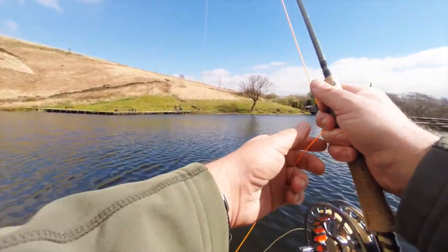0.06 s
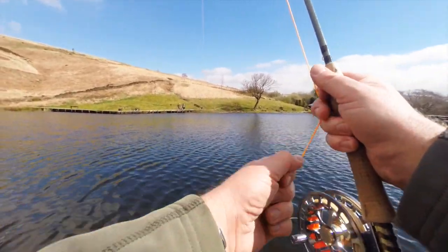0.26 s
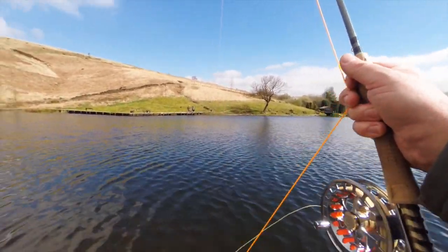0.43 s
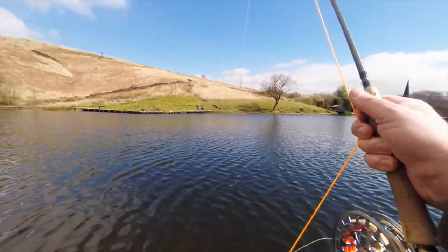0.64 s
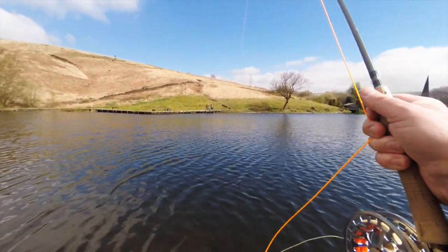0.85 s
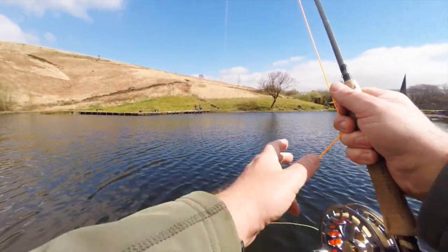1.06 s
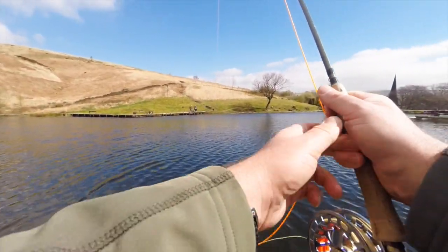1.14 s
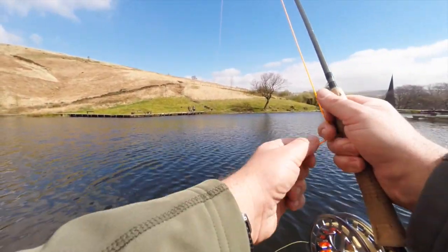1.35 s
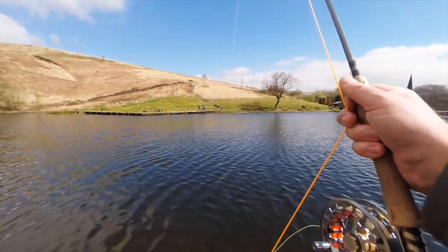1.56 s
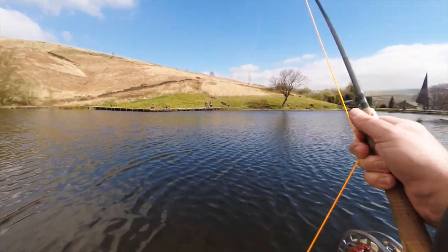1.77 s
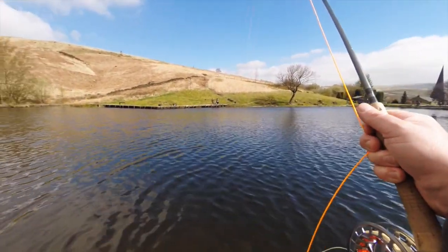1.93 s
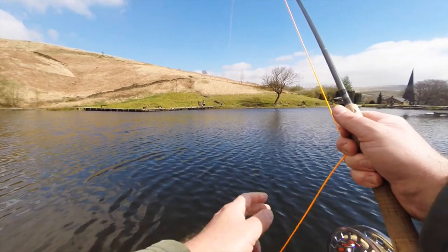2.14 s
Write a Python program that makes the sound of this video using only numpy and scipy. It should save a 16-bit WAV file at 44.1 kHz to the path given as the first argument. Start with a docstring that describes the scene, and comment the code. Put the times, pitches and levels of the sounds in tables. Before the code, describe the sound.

Fishing line drawn through rod guides twice, with sleeve swishes and wind on the microphone.

```python
"""Stripping fly line on a lake.

An angler draws in line in two pulls, close to a chest camera. Friction makes the line sing in the rod
guides and squeak as it catches, while the jacket sleeve swishes with each reach and draw of the arm.
Wind buffets the microphone; behind it are the lake's hush, one faint trill and a thin electrical whine."""
import sys
import numpy as np
from scipy.fft import rfft, irfft, next_fast_len
from scipy.io import wavfile
from scipy.ndimage import uniform_filter1d, map_coordinates

SR = 44100
rng = np.random.default_rng(int(sys.argv[2]) if len(sys.argv) > 2 else 0)


def file_out(sig):
    """Save sig as 16-bit WAV at sys.argv[1]."""
    # one column per channel
    cols = np.atleast_2d(sig).T
    # limit, then scale
    lim = np.clip(cols, -1, 1)
    pcm = np.round(lim * 32767).astype(np.int16)
    wavfile.write(sys.argv[1], SR, pcm)


N = 97020

# Envelopes of the singing line, one list per pull: time_s, level_db
LINE_PULLS = [
    [(0.392, -63), (.42, -51), (.47, -47.5), (.55, -44), (.61, -52), (.67, -49.5), (.72, -54), (.745, -71)],
    [(1.56, -64), (1.61, -55), (1.66, -46.5), (1.75, -48), (1.80, -52.5), (1.87, -50.5), (1.92, -68)],
]
# Resonances of line and guides: centre_hz, half_width_hz, gain_db
GUIDE_MODES = [(2800, 110, -1), (3024, 80, 2), (3235, 37, 7.5), (3330, 160, 1.5), (3500, 150, -3.5)]

def line():
    """Forced resonance: sliding friction excites close modes of line and guides, and a hollow rod tone."""
    def modes(f):
        peaks = (amp(db) / (1 + ((f - hz) / width) ** 2) for hz, width, db in GUIDE_MODES)
        return np.sqrt(sum(peak ** 2 for peak in peaks))

    def grip(pull):
        inside_s = np.minimum(clock() - pull[0][0], pull[-1][0] - clock())
        return np.clip(inside_s / 0.0092, 0, 1)  # grip and release take 9.2 ms each

    rod_hz, half_width_hz, rod_db = 960, 170, -4
    singing = unit(filtered(white(), modes)) * amp(0.64 * wobble(70))
    rub = amp(rod_db) * unit(filtered(white(), lambda f: 1 / (1 + ((f - rod_hz) / half_width_hz) ** 4)))
    return (singing + rub) * sum(amp(curves(pull)[0]) * grip(pull) for pull in LINE_PULLS)


# Catches of the line: centre_s, pitch_hz, sigma_s, peak_db
LINE_CATCHES = [(0.6736, 8400, 0.0002, -33.5), (0.6791, 3640, 0.0007, -31.5), (0.6803, 3730, 0.0035, -45),
                (.679, 4200, 0.0017, -51), (0.69, 4700, .004, -56), (1.2452, 4240, 0.0022, -42),
                (1.246, 3650, .002, -42), (1.8533, 3660, 0.0017, -35.5)]

def squeaks():
    """Stick-slip oscillation: each catch of the line gives a tiny tone under a Gaussian envelope."""
    out = np.zeros(N)
    for centre_s, hz, sigma_s, db in LINE_CATCHES:
        t = clock() - centre_s
        envelope = amp(db) * np.exp(-.5 * (t / sigma_s) ** 2)
        out += envelope * np.sin(2 * np.pi * hz * t + 0.75 * wobble(700))
    return out


# Arm movements: start_s, fastest_s, end_s, body_db, hiss_db, hiss_tilt_db_per_octave
ARM_STROKES = [(-.2, .02, 0.27, -44.5, -50.5, 2.5), (.35, 0.587, 0.85, -41.5, -48, -2.5),
               (0.58, 0.777, 0.85, -43.5, -58, 2.5), (0.988, 1.223, 1.268, -39, -46, 3),
               (1.186, 1.355, 1.433, -54, -56, 3), (1.582, 1.75, 1.871, -38.5, -47, -1.5),
               (1.742, 1.88, 2.024, -43.5, -52, -2), (2.02, 2.207, 2.2, -52, -58.5, 2.5)]
# Spectra of the sleeve's hollow body and of its hiss: frequency_hz, gain_db
BODY_SPECTRUM = [(60, 5), (200, -12.5), (480, -3), (640, -3), (830, 0.5), (1020, -3), (1300, -14),
                 (1650, -17), (2300, -19.5), (3500, -28), (8000, -76)]
HISS_SPECTRUM = [(1000, -30), (2600, -9.5), (3500, -2), (4600, -0.5), (5900, -5.5), (6700, -3), (7500, -9),
                 (8400, -5.5), (9300, -17), (10300, -12), (12500, -19.5), (15000, -26)]

def sleeve():
    """Friction noise: rubbing cloth grows louder as a power of arm speed; tiny slips add grain."""
    slips_per_s, slip_share = 610, 0.21
    out = np.zeros(N)
    for start, fastest, end, body_db, hiss_db, tilt_db in ARM_STROKES:
        slips = unit(white() * (rng.random(N) < slips_per_s / SR))
        friction = np.sqrt(1 - slip_share) * white() + np.sqrt(slip_share) * slips
        arm = speed(start, fastest, end)
        hiss = amp(hiss_db) * arm ** 1.25 * coloured(friction, HISS_SPECTRUM, tilt_db)
        body = amp(body_db) * arm ** 0.89 * coloured(white(), BODY_SPECTRUM)
        out += amp(0.96 * wobble(59.66)) * (body + hiss)
    return out


# Contacts of line and fingers with the rod: time_s, peak_db, centre_hz, sigma_octaves
ROD_TAPS = [(0.3528, -36, 1870, 0.57), (0.351, -39.5, 5300, 0.32), (.378, -45, 4860, 0.46),
            (0.956, -45, 1900, 0.72), (1.034, -40.5, 1500, 0.73), (1.044, -38.5, 7000, 0.69),
            (1.057, -45, 3000, .8), (1.073, -39, 4200, 0.61), (1.283, -40, 2180, .8),
            (1.9708, -30, 1190, .9), (2.006, -42.5, 3300, .6), (2.0195, -43, 1600, 0.91),
            (2.0801, -40.5, 4160, 0.57), (2.105, -41, 3300, 0.58)]

def taps():
    """Damped impact: an impulse and a short scuff pass through a broad band, with hardly any ring."""
    scuff_gain, scuff_t60_s = 0.2, 0.012
    out = np.zeros(N)
    for time_s, db, hz, octaves in ROD_TAPS:
        age = clock() - time_s
        contact = scuff_gain * white() * (age >= 0) * amp(-60 * np.abs(age) / scuff_t60_s)
        contact[round(time_s * SR)] += 1
        tap = filtered(contact, lambda f: np.exp(-.5 * (np.log2((f + 1) / hz) / octaves) ** 2))
        out += amp(db) * tap / np.abs(tap).max()
    return out


# Slides of slack line: start_s, fastest_s, end_s, level_db
SLACK_SLIDES = [(0.734, 0.886, 0.99, -65.5), (1.377, 1.577, 1.71, -59.5), (1.878, 1.954, 2, -58)]
# Spectrum of line on skin: frequency_hz, gain_db
SLACK_SPECTRUM = [(800, -15), (1600, -7), (2600, -7), (4000, -4), (5400, -4), (6000, -4), (6700, -5),
                  (7600, -16), (10000, -13), (15000, -26)]

def slack():
    """Sliding friction: loose line whispers over the fingers in proportion to its speed."""
    envelope = sum(amp(db) * speed(start, fastest, end) for start, fastest, end, db in SLACK_SLIDES)
    return envelope * amp(1.8 * wobble(90)) * coloured(white(), SLACK_SPECTRUM)


# Envelope of the gusts: time_s, relative_level_db
GUSTS = [(0.0, -50), (0.1, -41.5), (0.24, -26.5), (0.28, -40.5), (0.31, -19.5), (0.4, -17), (0.47, -22),
         (0.67, -23), (0.76, -37), (0.89, -35), (0.91, -28.5), (1.08, -37), (1.16, -36), (1.19, -44),
         (1.37, -33), (1.41, -25.5), (1.51, -31), (1.52, -39), (1.62, -30), (1.7, -40), (1.82, -44.5),
         (1.84, -34), (1.92, -34.5), (1.94, -45), (2.18, -36), (2.2, -53)]
# Brief eddies: centre_s, half_length_s, level_db
EDDIES = [(.16, 0.024, -41.5), (0.235, 0.017, -32), (0.351, 0.028, -29), (0.432, 0.019, -28.5),
          (0.517, 0.015, -27), (0.628, 0.061, -36.5), (0.851, 0.022, -37), (0.912, 0.013, -32.5),
          (0.962, 0.022, -36), (1.147, 0.055, -41), (1.314, .02, -41.5), (1.435, .018, -31.5),
          (1.628, 0.037, -41), (1.733, 0.03, -45), (1.925, 0.051, -48.5)]
# Spectra of gust rumble and eddy flutter: frequency_hz, gain_db
RUMBLE_SPECTRUM = [(15, -11.5), (34, 4), (58, -3.5), (85, -7), (120, -12), (200, -28), (400, -39.5),
                   (800, -61), (2000, -80), (6000, -105)]
FLUTTER_SPECTRUM = [(50, -55), (90, -6.5), (140, 4), (240, -6), (330, -13.5), (450, -19.5), (1200, -39),
                    (4000, -86)]

def wind():
    """Turbulent pressure on the microphone: gusts rumble, and single eddies add a brighter flutter."""
    def steady_noise(spectrum, samples, floor):
        noise = coloured(white(), spectrum)
        local_power = np.abs(uniform_filter1d(noise ** 2, size=samples))
        return unit(noise / np.sqrt(local_power + floor))

    gust_db, = curves(GUSTS)
    eddies = sum(amp(db) / (1 + ((clock() - s) / half) ** 2 / 2) ** 1.52 for s, half, db in EDDIES)
    rumble = steady_noise(RUMBLE_SPECTRUM, samples=1800, floor=0.016)
    flutter = steady_noise(FLUTTER_SPECTRUM, samples=900, floor=0.17)
    return amp(gust_db + 0.65) * rumble + eddies * flutter


# Contour of the trill: time_s, pitch_hz, level_db
TRILL_CONTOUR = [(.815, 4030, -78), (.825, 3880, -49.5), (0.842, 3520, -67), (.865, 3310, -55.5),
                 (.92, 3370, -55), (.97, 3380, -60), (1.05, 3490, -71)]

def trill():
    """Amplitude modulation: a whistle, perhaps a far bird, pulses quickly as its pitch drops and holds."""
    pulse_hz = 70
    t = clock()
    hz, db = curves(TRILL_CONTOUR)
    sounding = (t > TRILL_CONTOUR[0][0]) * (t < TRILL_CONTOUR[-1][0])
    pulses = np.cos(np.pi * pulse_hz * (t - TRILL_CONTOUR[1][0])) ** 2
    phase = 2 * np.pi * np.cumsum(hz) / SR + .4 * wobble(200)
    return amp(db) * pulses * sounding * np.sin(phase)


# Spectrum of the lake's hush: frequency_hz, gain_db
LAKE_SPECTRUM = [(30, -15), (120, 2.5), (300, 0), (550, -3), (850, -3.5), (1100, -10), (1600, -20.5),
                 (2500, -22), (4500, -21.5), (6500, -25.5), (9000, -33), (12000, -35.5), (15000, -43)]

def lake():
    """Incoherent addition: breeze and ripples merge into a nearly steady broadband noise."""
    return amp(-49 + 0.27 * wobble(7.2)) * coloured(white(), LAKE_SPECTRUM)


def whine():
    """Electrical interference: the camera adds a thin tone, gated by a softened square wave."""
    pitch_hz, level_db, pulse_hz = 10647, -69, 24
    t = clock()
    gate = uniform_filter1d(1.0 * (np.sin(2 * np.pi * pulse_hz * (t - .009)) > 0), size=60)
    return amp(level_db) * gate * np.sin(2 * np.pi * pitch_hz * t)


def speed(start, fastest, end):
    """Speed of a hand movement, 0-1: a blend of a sharp ramp and a smooth swing."""
    sharpness = 0.57
    ramp = np.interp(clock(), [start, fastest, end], [0, 1, 0])
    return sharpness * ramp + (1 - sharpness) * np.sin(np.pi / 2 * ramp)


def amp(db):
    """Decibels to amplitude ratio."""
    return 10 ** (np.asarray(db) / 20)


def unit(x):
    """Normalisation to rms 1."""
    return x / np.sqrt(np.mean(x ** 2) + 1e-20)


def clock():
    """Time of each sample in seconds."""
    return np.arange(N) / SR


def curves(rows):
    """Linear interpolation over time of each column after the first."""
    times, *columns = np.transpose(rows)
    return [np.interp(clock(), times, column) for column in columns]


def white():
    """Gaussian white noise."""
    return rng.standard_normal(N)


def wobble(knots_per_s):
    """Smooth random modulation: a spline through Gaussian knots."""
    return map_coordinates(rng.standard_normal(2048), [clock() * knots_per_s + 2], mode="wrap")


def filtered(x, response):
    """Linear filtering: the spectrum of x times a frequency response."""
    size = next_fast_len(N + SR // 2)
    return irfft(rfft(x, size) * response(np.fft.rfftfreq(size, 1 / SR)), size)[:N]


def coloured(x, spectrum, tilt_db=0):
    """Spectral shaping of x by a table and a tilt per octave, at rms 1."""
    hz, db = np.transpose(spectrum)
    response = lambda f: amp(np.interp(np.log(f + 1), np.log(hz), db) + tilt_db * np.log2(f + 1))
    return unit(filtered(x, response))


def scene():
    """Superposition: all sources add at one microphone."""
    return (line() + squeaks() + sleeve() + taps() + slack() + wind() + trill() + lake())[None]


def record(dry):
    """Band limiting: the camera passes the scene and its own whine only below a cutoff."""
    cutoff_hz = 15270
    return filtered(dry[0] + whine(), lambda f: f < cutoff_hz)[None]


dry = scene()
out = record(dry)
file_out(out)
```